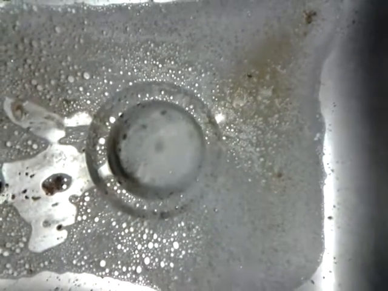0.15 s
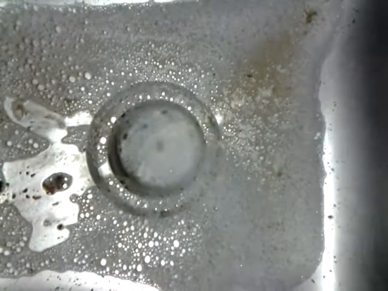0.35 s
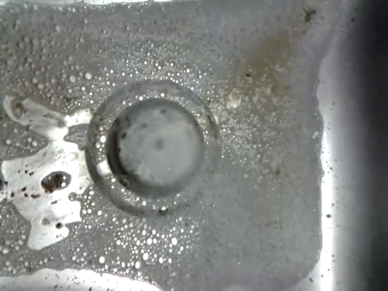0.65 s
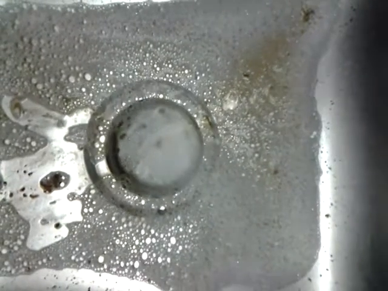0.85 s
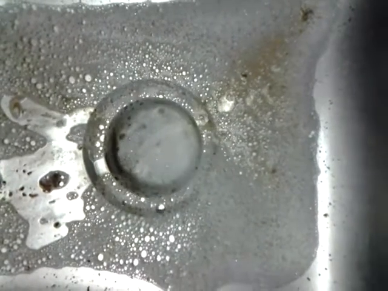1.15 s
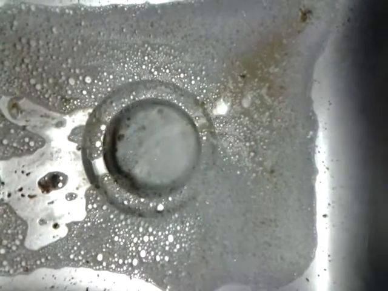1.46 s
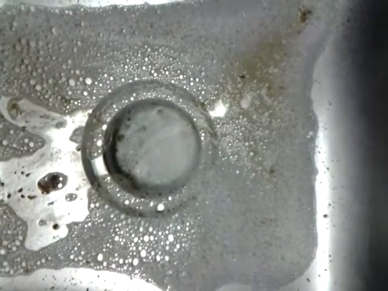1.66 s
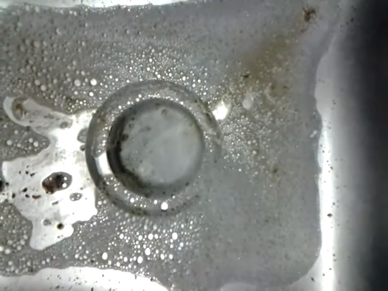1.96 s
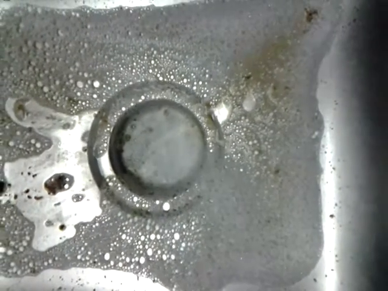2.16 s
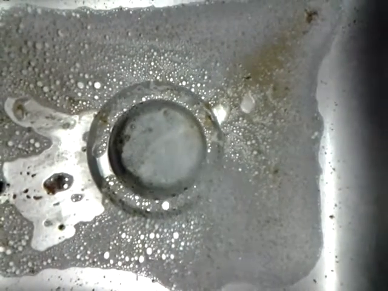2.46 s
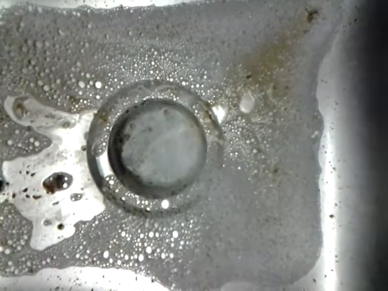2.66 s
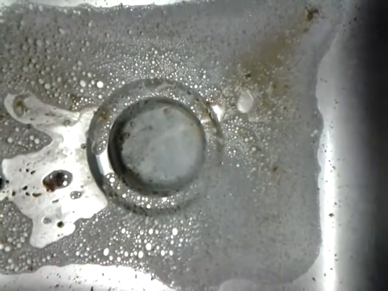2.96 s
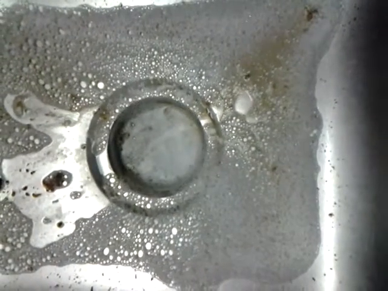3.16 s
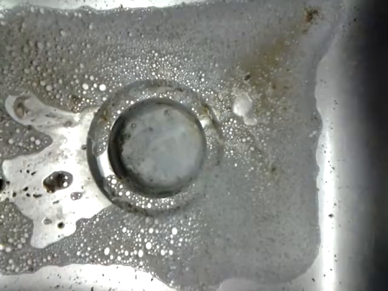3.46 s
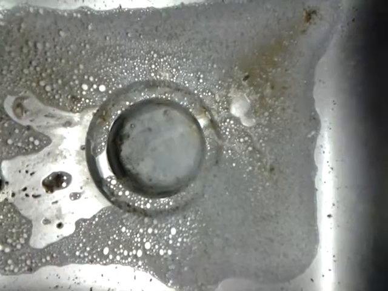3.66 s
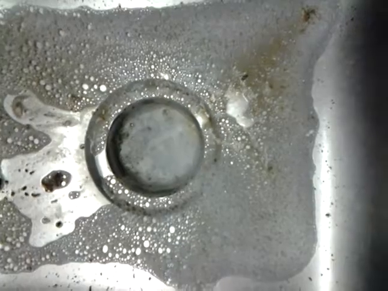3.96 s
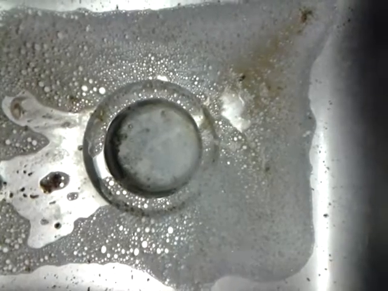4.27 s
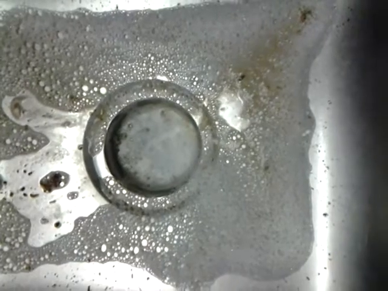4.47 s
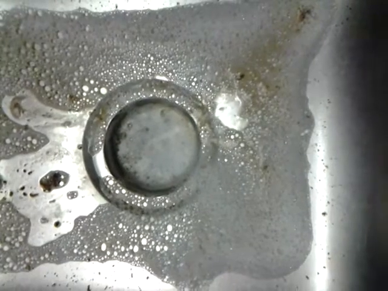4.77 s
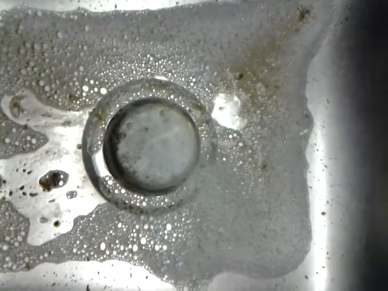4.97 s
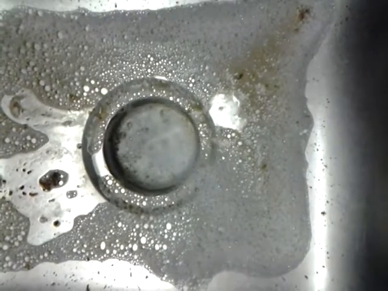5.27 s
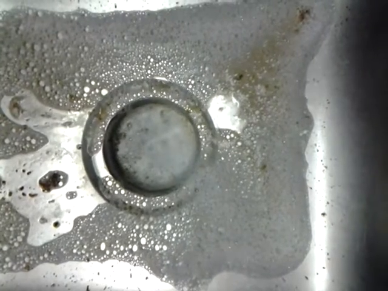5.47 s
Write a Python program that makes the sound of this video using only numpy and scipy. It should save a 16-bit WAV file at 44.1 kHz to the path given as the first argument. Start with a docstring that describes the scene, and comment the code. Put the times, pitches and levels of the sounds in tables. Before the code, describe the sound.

After a short quiet start, hollow low glugs, pops and wet droplets burst unevenly from a steel sink's drain.

```python
"""Glugs of air break through the last water in the drain of a steel sink, close to one microphone in a small
hard room. Each glug shoves the water column, sets bubbles of three sizes ringing and spits droplets.
A swirl of many small bubbles starts just before the first glug, and every splash trickles back down the pipe.
Resonances of pipe and basin colour all of these. Foam fizzes as a drifting band of noise, over a faint hum
of steady tones and soft room noise."""
import sys
import numpy as np
from scipy import signal
from scipy.fft import rfft, irfft, next_fast_len
from scipy.io import wavfile

SR = 44100
rng = np.random.default_rng(int(sys.argv[2]) if len(sys.argv) > 2 else 0)


def transcribe(u):
    """Save the signal u as a 16-bit wav file named by the first command-line argument.

    u: samples, shape (n,) or (channels, n), limited to [-1, 1]; the rate is SR.
    q: integer samples, one column per channel.
    """
    v = np.clip(np.atleast_2d(u).T, -1, 1)
    q = np.round(v * 32767).astype(np.int16)
    wavfile.write(sys.argv[1], SR, q)


N = 247842  # length of the scene [samples]

# Gulps of air through the water: (time [s], abruptness [0-1], level of the large bubble [dB],
# pitch of the large bubble [Hz], level of the middling bubbles [dB], level of the splash [dB])
GLUGS = [(0.72, 0.4, -30.5, 430, -39, -55), (.791, 0.31, -31.5, 388, -39, -49.5),
         (.804, 0.34, -39, 407, -37.5, -44), (.874, 0.46, -27.5, 462, -31.5, -39),
         (0.925, 1, -39, 327, -31, -41), (.942, 0.38, -28, 328, -31.5, -40),
         (1.009, 0.09, -28, 446, -33.5, -45), (1.06, 0.41, -31.5, 458, -33, -42.5),
         (1.101, 0.97, -53, 573, -29.5, -41), (1.136, 0.36, -29.5, 670, -34.5, -41.5),
         (1.17, 0.72, -31, 450, -30.5, -39.5), (1.215, 0.41, -41, 347, -37, -40.5),
         (1.28, 0.07, -36, 503, -34, -42), (1.368, 0.43, -33.5, 590, -35, -45.5),
         (1.475, 0, -33.5, 430, -40.5, -50), (1.501, 0.05, -27, 283, -48, -42.5),
         (1.533, 0.24, -29.5, 358, -33, -42.5), (1.572, 0.03, -27, 362, -36.5, -43.5),
         (1.693, 0.4, -29, 443, -40.5, -52), (1.714, 0.04, -27.5, 317, -41, -50),
         (1.726, 0.97, -33.5, 370, -37, -39), (1.74, 0.27, -26.5, 290, -26, -40.5),
         (1.757, 0.55, -25, 525, -28.5, -43), (1.784, 0.53, -24.5, 400, -35.5, -45),
         (1.884, 0.52, -30, 445, -35.5, -43.5), (1.9, 0, -31, 387, -44, -43),
         (1.938, 0.06, -35, 423, -41, -46), (2.073, 0.46, -37.5, 470, -40, -55),
         (2.084, 0.12, -27, 410, -39.5, -40.5), (2.096, 0.44, -30.5, 320, -36, -38),
         (2.114, .8, -31, 390, -53, -44), (2.144, 0.38, -23.5, 478, -28.5, -38.5),
         (2.394, 0.48, -27, 467, -39, -51), (2.4, 0.12, -22, 406, -36.5, -46),
         (2.416, 0.36, -31, 363, -41, -51), (2.429, 0.53, -30, 374, -33, -39),
         (2.449, 0.94, -20.5, 450, -26.5, -40.5), (2.485, .8, -22.5, 487, -28.5, -35.5),
         (2.501, 0.27, -55, 454, -36, -39.5), (2.744, 0.51, -22, 475, -33, -44),
         (2.851, .6, -29, 464, -44.5, -47.5), (2.997, .4, -31.5, 420, -36, -50),
         (3.003, 0.68, -29.5, 460, -28, -33.5), (3.034, 0.49, -27, 493, -40, -44.5),
         (3.06, .5, -34, 477, -34.5, -43), (3.085, 0.06, -37, 400, -40.5, -49),
         (3.35, 0.69, -26, 563, -33, -40.5), (3.401, 0.48, -30.5, 390, -44, -49.5),
         (3.422, .85, -25, 474, -32.5, -39.5), (3.471, 0.23, -63, 584, -43.5, -48.5),
         (3.595, .45, -27, 530, -37, -43.5), (3.606, 0.14, -33, 410, -38, -44.5),
         (3.64, .3, -31.5, 453, -35.5, -44), (3.663, 0.42, -28, 276, -39, -46.5),
         (3.951, 0.7, -37, 480, -51, -58), (3.958, 0.27, -28.5, 556, -38, -45),
         (3.98, 1, -28.5, 337, -35, -52), (4.017, 0.92, -25, 460, -38.5, -46.5),
         (4.104, .6, -39, 288, -37, -44.5), (4.168, 0.17, -55, 446, -53, -58),
         (4.243, 0.42, -26, 502, -34.5, -43), (4.29, 0.56, -39, 350, -32, -38),
         (4.331, 0.51, -30.5, 455, -38, -47), (4.635, 0.5, -27, 511, -28.5, -40),
         (4.653, .3, -32, 400, -48, -42.5), (4.669, 0.41, -22, 460, -31.5, -34.5),
         (4.687, 0.89, -28.5, 357, -54, -45), (4.71, 0.97, -30.5, 382, -37.5, -40),
         (4.854, .9, -34, 473, -28.5, -40.5), (4.91, .7, -47, 593, -33, -55),
         (4.934, 0.33, -28, 415, -37.5, -42), (5.193, 0.54, -29.5, 505, -41.5, -52.5),
         (5.215, 0.36, -23.5, 424, -37.5, -43.5), (5.238, 1, -25, 515, -34, -40),
         (5.267, 0.66, -24.5, 336, -33, -42), (5.412, 0.26, -61, 450, -50, -66.5),
         (5.467, 0.24, -53, 450, -50.5, -67), (5.508, 0.54, -24.5, 467, -37.5, -38.5),
         (5.535, .3, -29, 369, -56, -48), (5.562, 0.58, -37, 547, -30, -34),
         (5.589, 0.05, -33, 467, -48, -45)]
# Resonances of pipe and basin: (frequency [Hz], width [Hz], relative level [dB])
RESONANCES = [(97.7, 100, -14), (112.4, 48, -8.5), (171.8, 9.8, -6), (229.5, 47.5, -6.5),
              (329.3, 17.2, -2.5), (411.7, 9.1, -7), (472.4, 28.4, 3.5), (607.5, 14, -6), (634, 33, -3.5),
              (744, 200, -20.5), (1067.7, 48, -3), (1190.4, 29, -7), (1237, 45, -11.5), (1368, 232, -12.5),
              (1752, 130, -14.5), (1859, 36, -9), (2014, 13.6, -12.5), (2223, 135, -18), (2586, 140, -16.5),
              (2785, 33, -17.5), (3264, 265, -17), (3617, 29, -14.5), (3986, 150, -15), (4136, 110, -16),
              (4480, 330, -35), (5410, 90, -31.5), (6044, 84, -30.5), (6510, 200, -35.5), (7440, 500, -56),
              (9700, 4000, -74)]
# Air seeping through the froth: (time [s], level before a 5 dB cut [dB], centre of the hiss [Hz])
FOAM = [(0, -58, 4800), (.6, -61, 4700), (1.961, -58, 4800), (2.3, -49, 4390), (2.65, -61.5, 4490),
        (4.5, -61.5, 4550), (5.62, -57.5, 4640)]
# A faint steady hum in the room: (frequency [Hz], level [dB])
HUM_TONES = [(231.5, -56.5), (279.9, -61), (323.0, -61)]
# Colour of the room noise: (frequency [Hz], relative level per Hz [dB])
ROOM_TONE = [(20, 4.5), (45, -0.5), (80, -6), (120, 3.5), (165, -4.5), (240, -0.5), (320, 1.5), (450, -3),
             (700, -9), (1150, -10.5), (2000, -19.5), (3500, -21.5), (7000, -27.5), (14500, -33)]
# How long the room rings: (frequency [Hz], time to fall by 60 dB [s])
ROOM_DECAY = [(100, 0.58), (300, 0.2), (1200, 0.39), (3000, 0.34), (7000, 0.24)]

TOP_HZ = 14350  # nothing is heard above this
# One glug, in samples: its length with tail, the lead before its main bubble, and its loud start
LENGTH, LEAD, HEAD = 16384, 512, 1024
AGE = np.arange(LENGTH) / SR  # [s]
BINS = np.fft.rfftfreq(2 * LENGTH, 1 / SR)  # [Hz]

# The water seal closes again within about RESEAL_S; a closed seal breaks into
# higher plinks (share of pitch added) and more spray
RESEAL_S, SEALED_PLINK_RISE, SEALED_SPRAY_DB = 0.11, 0.54, 6.5
# Standing water covers the drain, sinks away between these times, and muffles plinks and spray
COVERED_S, OPEN_S = 0.87, 1.31
COVER_PLINK_DB, COVER_SPRAY_DB = -0.5, -17.5
# Shove of the water column: level in an average glug, then dB gained per dB of a stronger gulp,
# per dB of a stronger splash, and per octave of a higher gulp
SHOVE_DB, SHOVE_PER_GULP, SHOVE_PER_SPLASH, SHOVE_DB_PER_OCTAVE = -37, 0.12, 0.39, -4.5
# Small bubbles (plink) and droplets (spray): level against the splash
PLINK_DB, SPRAY_DB = 0.5, -7.5
# Pitch of the middling bubbles (pop), and its scatter from glug to glug (share)
POP_HZ, POP_SCATTER = 1198, 0.062
# The plinks climb as the pipe empties: pitch at time zero, and climb
PLINK_HZ, PLINK_CLIMB_HZ_PER_S = 2096, 124
# Swirl in the throat of the drain: start, rise and hold times, level, and how fast it dies
SWIRL_S, SWIRL_ATTACK_S, SWIRL_HOLD_S = 0.633, 0.12, 0.22
SWIRL_DB, SWIRL_FALL_DB_PER_S = -34, 33
# Trickle after each glug: level against its splash, time to fall by 60 dB, middle pitch of its bubbles
TRICKLE_DB, TRICKLE_T60_S, TRICKLE_HZ = -11, 0.52, 1886


def glugs():
    """Each glug shoves the water column, rings large, middling and small bubbles, and spits droplets."""
    column, throat, neck = drain(81.5, 272), drain(246, 890), drain(580, 2210)
    mouth, rim = drain(1865, 4660), drain(5250, 13000)
    times, _, gulps, gulp_pitches, _, splashes = np.transpose(GLUGS)
    shoves = SHOVE_DB + SHOVE_PER_GULP * (gulps - gulps.mean())
    shoves += SHOVE_PER_SPLASH * (splashes - splashes.mean())
    shoves += SHOVE_DB_PER_OCTAVE * np.log2(gulp_pitches / gulp_pitches.mean())
    # the longer the wait since the last glug, the more fully the seal has closed
    waits = np.diff(times, prepend=times[0])
    seals = 1 - np.exp(-(waits / RESEAL_S) ** 2)

    out = np.zeros(N + LENGTH)
    for glug, shove_db, sealed in zip(GLUGS, shoves, seals):
        s, abrupt, gulp_db, gulp_hz, pop_db, splash_db = glug
        seep = 1.02 * np.clip(1.05 - abrupt, 0, 1)  # an abrupt glug gives almost no warning
        cover = np.interp(s, [COVERED_S, OPEN_S], [1, 0])
        plink_db = splash_db + PLINK_DB + COVER_PLINK_DB * cover
        spray_db = splash_db + SPRAY_DB + COVER_SPRAY_DB * cover + SEALED_SPRAY_DB * sealed
        pop_hz = POP_HZ * np.exp(POP_SCATTER * rng.standard_normal())
        plink_hz = (PLINK_HZ + PLINK_CLIMB_HZ_PER_S * s) * (1 + SEALED_PLINK_RISE * sealed)

        shove = amp(shove_db) * burst(column, hz=155, first=0.5, lead_in=seep, spread=0.00789,
                                      scatter=0.34, cycles=0.64, rise=0.08, count=7)
        gulp = amp(gulp_db) * burst(throat, gulp_hz, first=0.19 + 0.79 * abrupt, lead_in=seep,
                                    spread=0.004048, scatter=0.38, cycles=1.49, rise=0.14, count=9)
        pop = amp(pop_db) * burst(neck, pop_hz, first=1.48 * abrupt, lead_in=seep, spread=0.0045,
                                  scatter=0.2, cycles=2.24, rise=0.14, count=12)
        plink = amp(plink_db) * burst(mouth, plink_hz, first=0.39 * abrupt, lead_in=0.55 * seep,
                                      spread=0.005, scatter=0.33, cycles=2.73, rise=0.035, count=24)
        spray = amp(spray_db) * burst(rim, hz=5910, first=0.5 * abrupt, lead_in=0.55 * seep,
                                      spread=0.006, scatter=0.14, cycles=2.0, rise=0.046, count=60)
        start = round(s * SR) - LEAD
        whole = shove + gulp + pop + plink + spray
        out[start:start + LENGTH] += in_room(whole, wet_db=-9.0, onset=0.0032)
    return out[:N]


def burst(response, hz, first, lead_in, spread, scatter, cycles, rise, count):
    """A main bubble of relative size first rings in a swarm, through the drain, scaled to a set energy."""
    # an abrupt swarm crowds in at once, a soft one swells; spread is in seconds
    waits = rng.exponential(size=(2, count))
    delays = spread * (1.2 * waits[0] + 1.5 * lead_in * waits[1])
    sizes = rng.standard_normal(count) * np.exp(-(delays / (4.2 * spread)) ** 2)
    sizes /= np.linalg.norm(sizes)
    # the last quarter of the bubbles slip through just before the seal of water breaks
    early = np.arange(count) >= count * 3 // 4
    delays = np.where(early, -0.007 * rng.random(count), delays)
    sizes = np.where(early, 1.11 * lead_in * sizes, sizes)
    pitches = hz * np.exp(scatter * rng.standard_normal(count))
    delays[0], sizes[0], pitches[0] = 0, -first, hz  # the main bubble
    swarm = bubbles(LEAD + SR * delays, sizes, pitches, cycles, rise, size=LENGTH)
    heard = irfft(rfft(swarm, 2 * LENGTH) * response)[:LENGTH]
    # rms 1 if all the energy lay within the loud start
    return heard / np.sqrt(np.sum(heard ** 2) / HEAD + 1e-20)


def bubbles(starts, sizes, hz, cycles, rise, size):
    """Each bubble swells, rings for some cycles and climbs in pitch as it nears the surface."""
    step = np.arange(min(int(6 * cycles * SR / np.median(hz)), 4 * HEAD))
    life = step / SR * hz[:, None] / cycles  # age, counted in decay times
    pitch = hz[:, None] * (1 + rise * (0.5 - np.exp(-life)))
    tone = np.sin(2 * np.pi * np.cumsum(pitch, axis=1) / SR)
    swell = 1 - np.exp(-life / 0.044)
    rings = sizes[:, None] * tone * np.exp(-life) * swell
    # add every ring into the sound at its own place
    places = np.maximum(starts, 0).astype(int)[:, None] + step
    return np.bincount(places.ravel(), rings.ravel(), size)[:size]


def drain(lo_hz, hi_hz):
    """Pipe and basin boost their resonances in a source that spans lo_hz to hi_hz, with no pre-echo."""
    power = sum(amp(db) ** 2 / (1 + ((BINS - hz) / (width / 2)) ** 2) ** 1.29
                for hz, width, db in RESONANCES)
    span = (1 + (lo_hz / (BINS + 1)) ** 10) * (1 + (BINS / hi_hz) ** 10)
    # folding the cepstrum (spectrum of the log spectrum) makes the response start at once
    cepstrum = irfft(np.log(power / span + 1e-12) / 2)
    cepstrum[1:LENGTH] *= 2
    cepstrum[LENGTH + 1:] = 0
    return np.exp(rfft(cepstrum))


def in_room(x, wet_db, onset):
    """Room echoes blur into a fresh noise tail that builds up over onset seconds and dies by pitch."""
    hz, t, cells = signal.stft(rng.standard_normal(LENGTH), SR, nperseg=256)
    decay = amp(-60 * t / along(ROOM_DECAY, hz)[:, None])
    tail = signal.istft(cells * decay, SR, nperseg=256)[1][:LENGTH]
    tail *= 1 - np.exp(-(AGE / onset) ** 2)
    tail /= np.linalg.norm(tail)
    return x + amp(wet_db) * signal.fftconvolve(x, tail)[:LENGTH]


def swirl(count=14000):
    """The swirl draws in air as a stream of small bubbles of many sizes; it swells, holds and dies away."""
    starts, sizes = rng.random(count) * N, rng.standard_normal(count)
    pitches = 1300 * np.exp(0.717 * np.clip(rng.standard_normal(count), -2, 2))
    sizes = sizes * (pitches / np.median(pitches)) ** 0.6
    stream = bubbles(starts, sizes, pitches, cycles=1.3, rise=0.061, size=N)
    heard = signal.fftconvolve(stream, irfft(drain(83, 3100))[:LENGTH])[:N]
    age = np.arange(N) / SR - SWIRL_S
    attack = np.clip(age / SWIRL_ATTACK_S, 0, 1)
    dying = np.maximum(age - SWIRL_ATTACK_S - SWIRL_HOLD_S, 0)
    return attack * amp(SWIRL_DB - SWIRL_FALL_DB_PER_S * dying) * unit(heard)


def trickle(count=1500):
    """Water thrown up by each splash runs back down the pipe as a fading patter of small bubbles."""
    times, *_, splashes = np.transpose(GLUGS)
    thrown = np.bincount((times * SR).astype(int), amp(splashes + TRICKLE_DB) ** 2, N)[:N]
    # each splash adds power, which then drains away
    keep = np.exp(-2 * np.log(1000) / (TRICKLE_T60_S * SR))
    power = signal.lfilter([1], [1, -keep], thrown)
    starts, sizes = rng.random(count) * N, rng.standard_normal(count)
    pitches = TRICKLE_HZ * np.exp(0.423 * np.clip(rng.standard_normal(count), -2, 2))
    sizes = sizes * (pitches / TRICKLE_HZ) ** 0.6
    patter = bubbles(starts, sizes, pitches, cycles=5.1, rise=0.15, size=N)
    heard = signal.fftconvolve(patter, irfft(drain(600, 4500))[:LENGTH])[:N]
    return np.sqrt(power) * unit(heard)


def foam():
    """Air seeps through the froth with a thin hiss: a narrow band of noise whose centre drifts."""
    s, fizz_db, centre_hz = np.transpose(FOAM)
    t = np.arange(N) / SR
    # two slow noises on a sine and a cosine carrier make a band around the centre
    slow = filtered(rng.standard_normal((2, N)), lambda hz: 1 / (1 + (hz / 620) ** 2))
    phase = 2 * np.pi * np.cumsum(np.interp(t, s, centre_hz)) / SR
    hiss = unit(slow[0] * np.cos(phase) + slow[1] * np.sin(phase))
    return amp(np.interp(t, s, fizz_db) - 5.0) * hiss


def hum():
    """A few low, steady sine tones hum faintly in the room."""
    t = np.arange(N) / SR
    return sum(np.sqrt(2) * amp(db) * np.sin(2 * np.pi * (hz * t + rng.random()))
               for hz, db in HUM_TONES)


def room_tone():
    """The room's soft background is steady noise, strongest in the lows."""
    colour = filtered(rng.standard_normal(N), lambda hz: amp(along(ROOM_TONE, hz)))
    return amp(-50.5) * unit(colour)


def amp(db):
    """Turn decibels into gain."""
    return 10 ** (np.asarray(db) / 20)


def unit(x):
    """Scale x to rms 1."""
    return x / np.sqrt(np.mean(x ** 2) + 1e-20)


def along(points, hz):
    """Read a value between (frequency [Hz], value) points on a log frequency axis."""
    f, v = np.transpose(points)
    return np.interp(np.log(hz + 1), np.log(f), v)


def filtered(x, gain):
    """Multiply the spectrum of x by a gain that depends on frequency."""
    size = next_fast_len(N + SR // 4)
    return irfft(rfft(x, size) * gain(np.fft.rfftfreq(size, 1 / SR)), size)[..., :N]


def scene():
    """Drain, foam, hum and room tone reach one microphone, which feeds both channels alike."""
    mono = glugs() + swirl() + trickle() + foam() + hum() + room_tone()
    return np.array([mono, mono])


def record(dry):
    hiss = filtered(rng.standard_normal((2, N)), lambda hz: amp(-66.5) / (1 + (4900 / (hz + 1)) ** 7))
    fade = np.minimum(1, np.arange(N)[::-1] / 64)  # over the last 64 samples
    return filtered(fade * (dry + hiss), lambda hz: hz < TOP_HZ)


dry = scene()
out = record(dry)
transcribe(out)
```